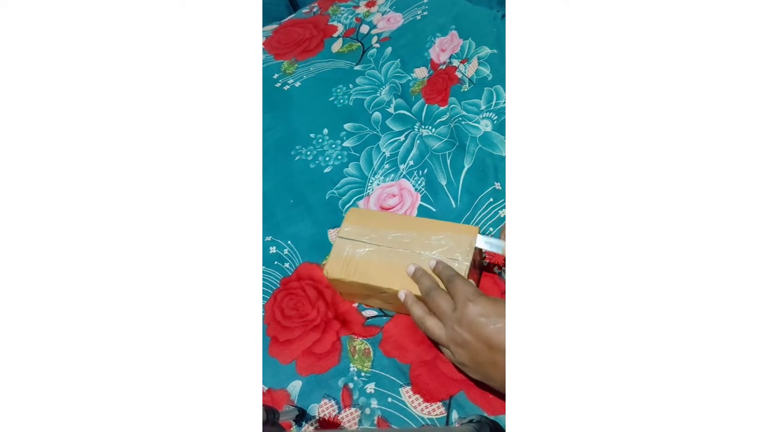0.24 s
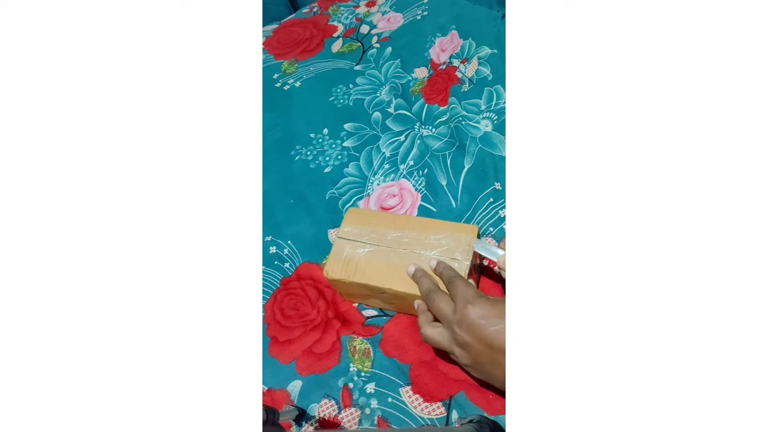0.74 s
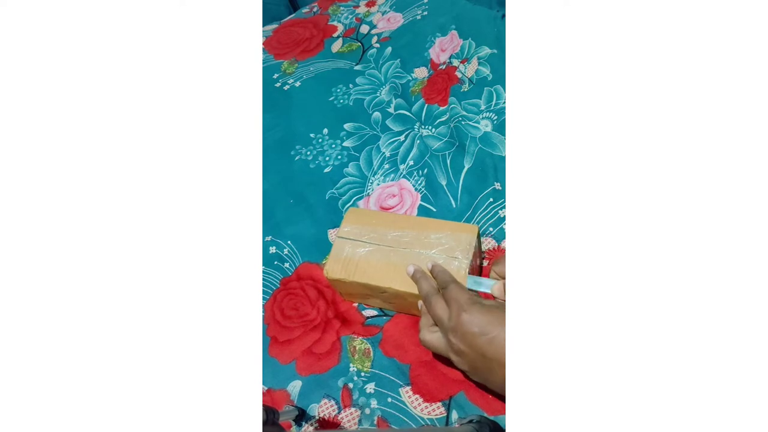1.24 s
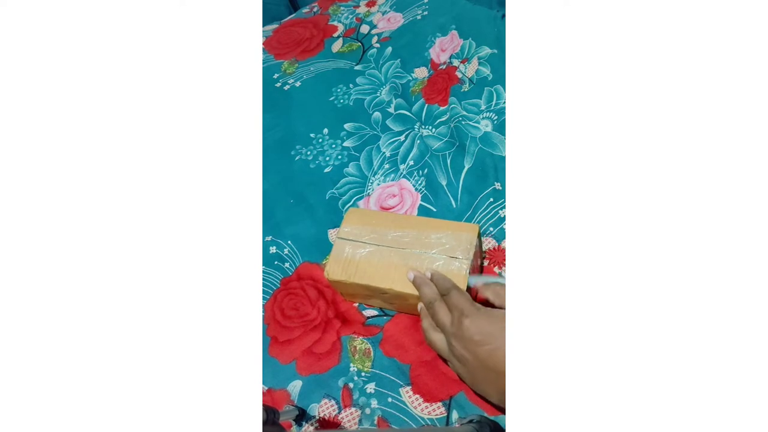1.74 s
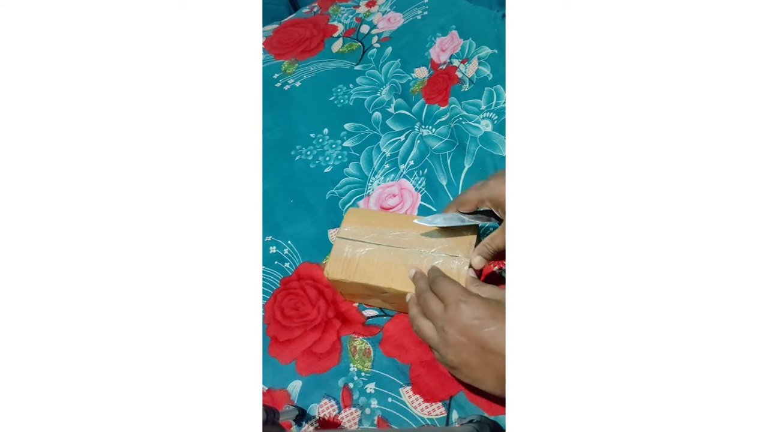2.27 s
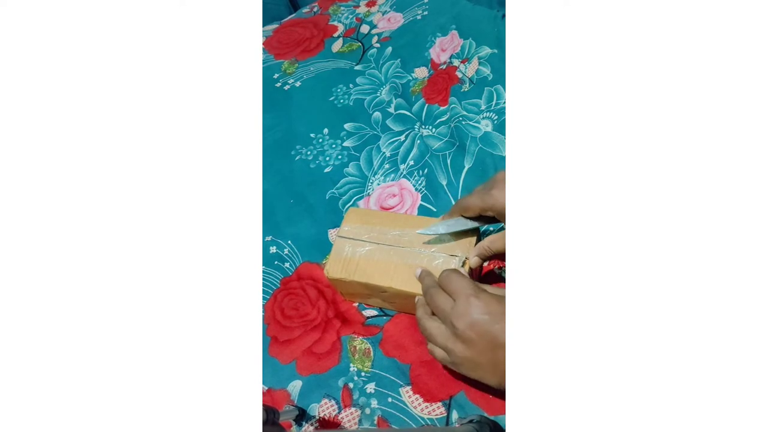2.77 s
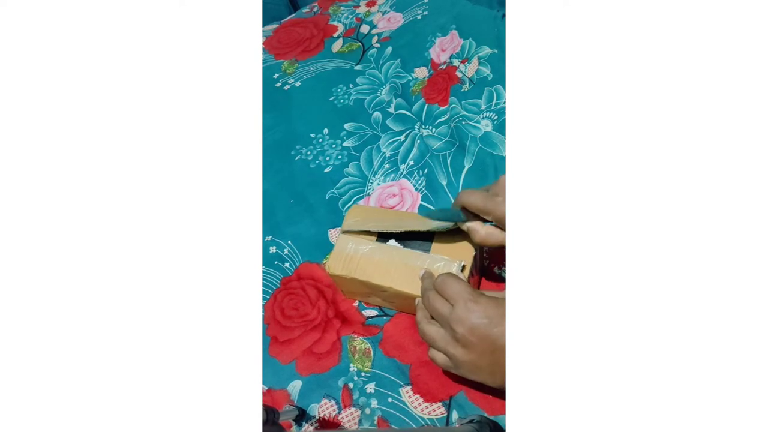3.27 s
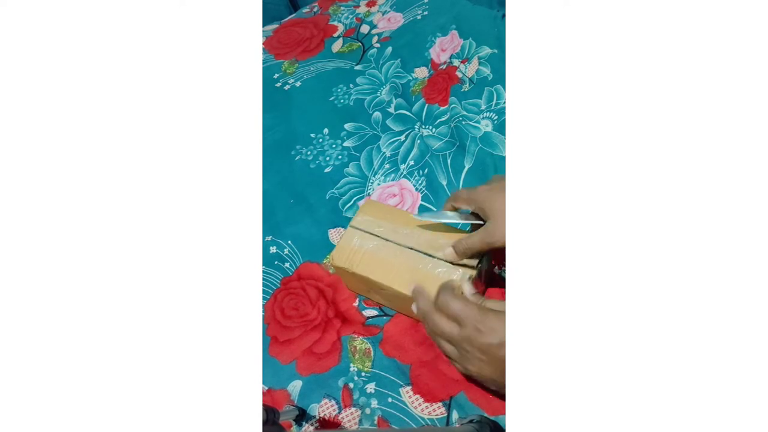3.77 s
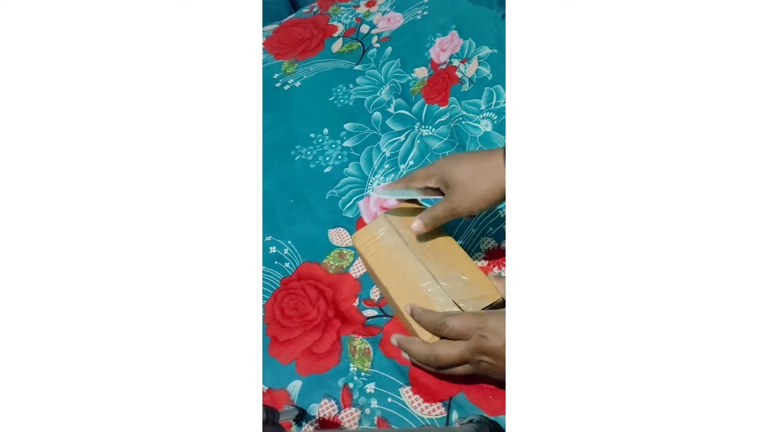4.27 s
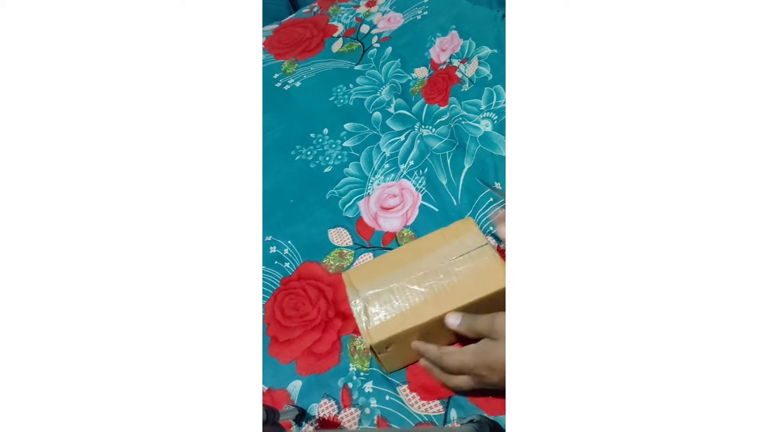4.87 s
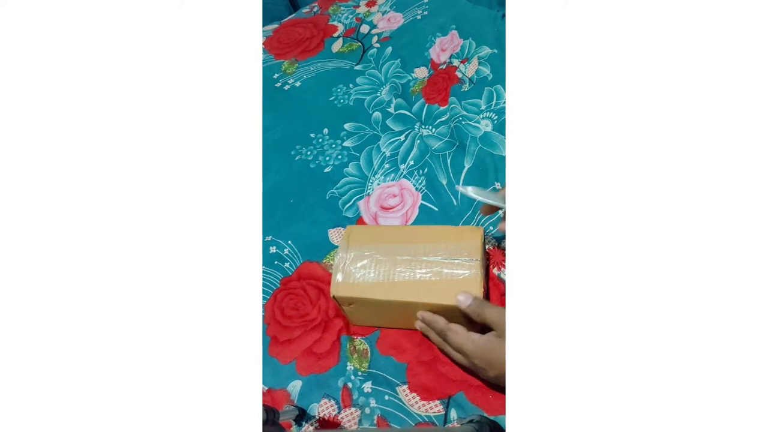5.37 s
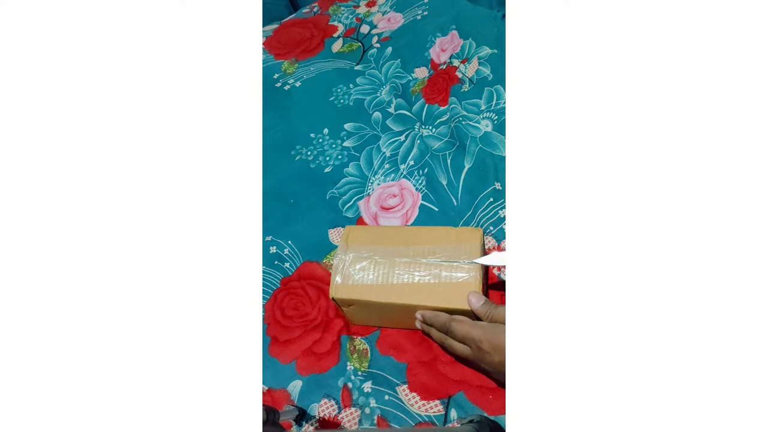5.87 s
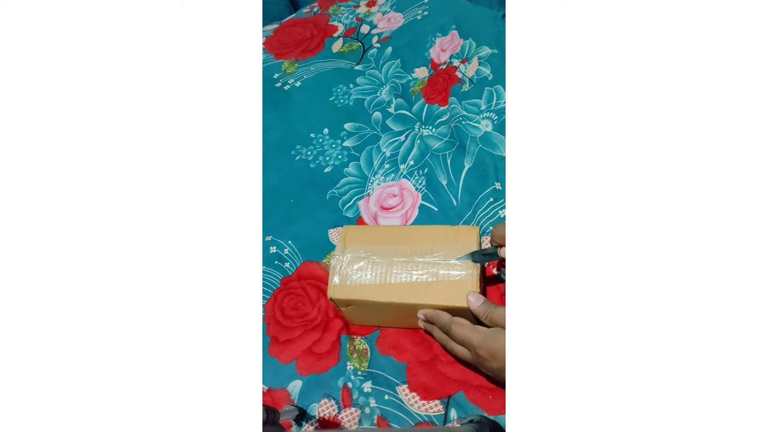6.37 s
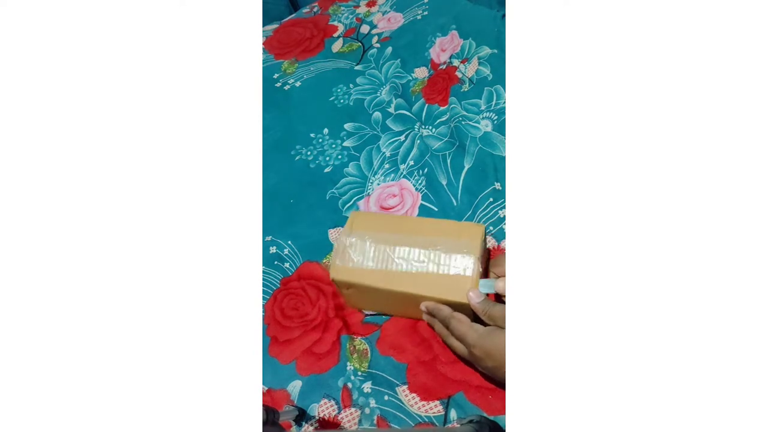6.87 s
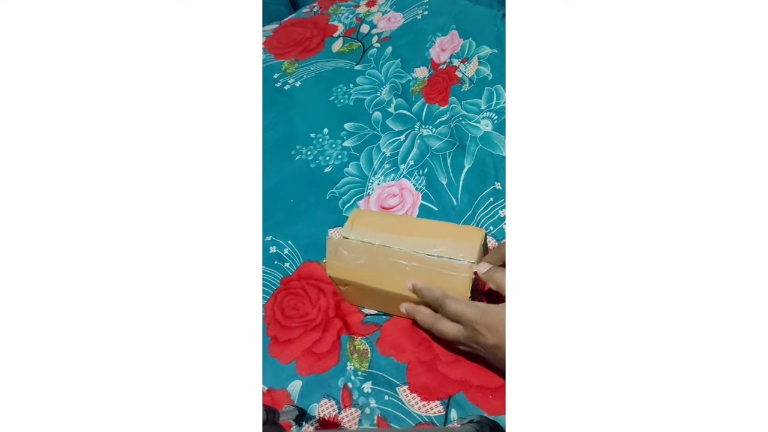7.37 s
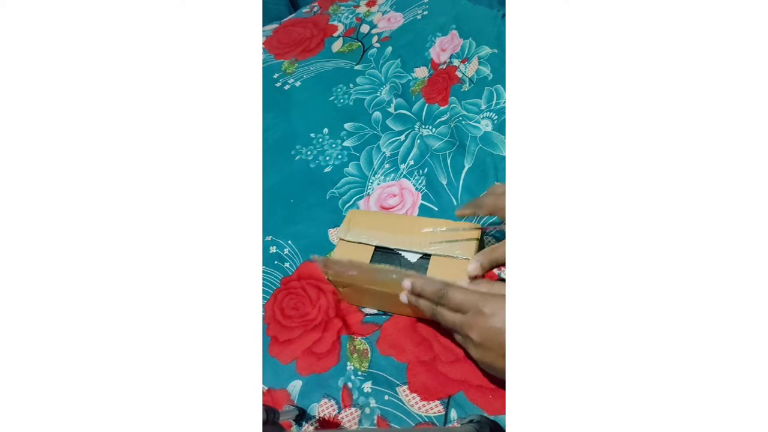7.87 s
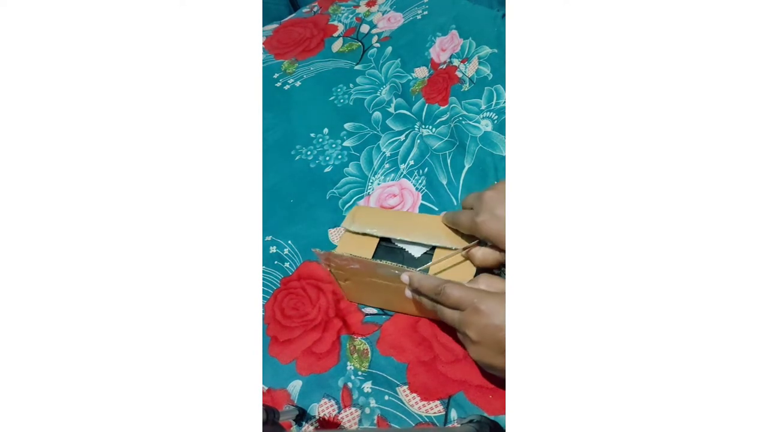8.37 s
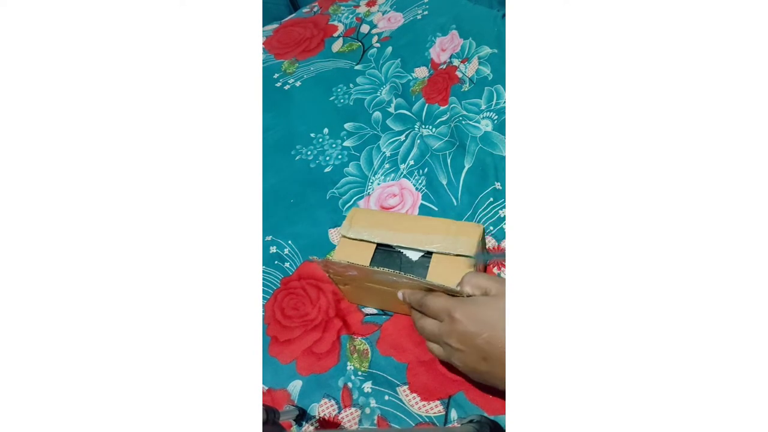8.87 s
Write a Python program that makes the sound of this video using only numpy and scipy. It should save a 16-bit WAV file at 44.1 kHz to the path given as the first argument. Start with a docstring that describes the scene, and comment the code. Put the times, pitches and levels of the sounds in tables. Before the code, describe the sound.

Small cardboard box being cut open, heard close indoors. Faint finger rubs and taps lead to brief gritty strokes and small rips of plastic tape. Quiet handling, crisp snaps and a swishing turn on cloth follow. Light scratching with crackles builds to one sharp, much louder tear with a boxy knock, then shorter rasps, a dull bump, soft rubbing and a last snap. Faint room tail and low rumble.

```python
"""Tape snaps, fizzes and rips under a sawing knife, while the small cardboard box it seals drums along.
Friction makes each cut: the blade sticks and slips, and shakes the cut edge, hollow box and tape film.
Between cuts, hands rub, turn and bump the box: softer friction, and blows that ring damped resonances.
The box lies on a cloth in a quiet room, which adds quick echoes, a faint tail and a low rumble."""
import sys
import numpy as np
from scipy import signal
from scipy.fft import rfft, irfft, next_fast_len
from scipy.io import wavfile
from scipy.ndimage import uniform_filter1d

SR = 44100
rng = np.random.default_rng(int(sys.argv[2]) if len(sys.argv) > 2 else 0)


def unload_audio(sound):
    """Save the sound as a 16-bit wav file, at the path given as the first command line argument."""
    columns = np.transpose(np.atleast_2d(sound))
    # keep every value between -1 and 1, then stretch to whole-number steps
    steps = np.round(np.clip(columns, -1, 1) * 32767)
    wavfile.write(sys.argv[1], SR, steps.astype(np.int16))


N = 402191  # length of the scene in samples
RESPONSE_N = 4096  # length of an impulse response in samples
BINS = np.fft.rfftfreq(RESPONSE_N, 1 / SR)  # its frequencies in Hz

# Source levels in dB hold before the ports and the room; colours are relative.

# Strokes of the blade sawing through tape. Each row: start in seconds, length in seconds,
# rasp level in dB, growth over the stroke in dB, drumming re rasp in dB, fizz re rasp in dB.
SAW_STROKES = [(0.677, 0.18, -61.5, 14, 4, -1.5), (0.89, 0.017, -62.5, -1, 2, 2),
               (1.051, 0.05, -56, -13, -0.5, -3.5), (1.189, 0.1, -63.5, 6, 5, -3.5),
               (1.515, 0.21, -65.5, 18.5, 4.5, 0), (6.395, 0.076, -66, -7.5, 12, 4),
               (6.483, 0.12, -59, -11, 12.5, -4), (6.627, 0.076, -51.5, 5.5, 7.5, -2),
               (6.766, 0.015, -56.5, -8, 6, -5.5), (7.073, 0.087, -49.5, 7.5, 6, -11),
               (7.257, 0.085, -52, -2, 1, -10.5), (7.401, 0.066, -63, 11, 7.5, -3.5)]
# The tape giving way all at once. Each row: time of the height in seconds, length in seconds,
# rasp level in dB, fizz re rasp in dB.
RIPS = [(0.852, 0.021, -47, 1), (1.723, 0.047, -55, 4), (2.805, 0.016, -48.5, 12.5),
        (6.603, 0.034, -41.5, -13), (6.706, 0.028, -23, -7), (7.973, 0.025, -57.5, 1)]
# Colour of the cut edge. Each row: frequency in Hz, level in dB.
EDGE_COLOUR = [(450, -12), (650, -2), (900, 1.5), (1600, 6), (2150, 3.5), (2600, -3), (3200, -7),
               (3800, -26), (6000, -60)]
# Colour of the hollow box. Each row: frequency in Hz, level in dB.
BOX_COLOUR = [(30, -36), (80, -4), (150, -5), (240, -3), (320, 0.5), (410, -2), (520, -9), (750, -11),
              (1500, -72)]
# Colour of the tape film. Each row: frequency in Hz, level in dB.
FILM_COLOUR = [(1800, -8), (3000, 10), (3900, 0.5), (4800, 9), (7500, 7), (9000, -0.5), (12500, -3.5),
               (14500, 2.5)]


def cutting():
    """Stick-slip excitation: jerks of the blade drive edge, box and film; in a rip they crowd together."""
    edge = response(read(EDGE_COLOUR, BINS) + panel_db())
    box = response(read(BOX_COLOUR, BINS) + panel_db())
    film = response(read(FILM_COLOUR, BINS))
    bodies = [edge, box, film]
    sawing = wandering(slips(per_s=550, spread_db=3, drag=0.3, ragged_db=1.8), patchy_db=3.5)
    tearing = wandering(slips(per_s=2200, spread_db=2.5, drag=0.3, ragged_db=1.5), patchy_db=3.5)
    out = np.zeros(N)
    for start, length, db, growth_db, drum_db, fizz_db in SAW_STROKES:
        levels = [db, db + drum_db, db + fizz_db]
        out += stroke(start, draw(length, growth_db), sawing, bodies, levels)
    for s, length, db, fizz_db in RIPS:
        # the more film parts, the harder the box springs back, up to 2 dB re rasp
        drum_db = 2 + min(fizz_db, 0)
        start, force = swell(s, length, rise_share=0.56, shape=1.68)
        out += stroke(start, force, tearing, bodies, [db, db + drum_db, db + fizz_db])
    return out


# The strip of tape ahead of the blade singing as its free length changes. Each row: start in seconds,
# length in seconds, level in dB, first resonance in Hz, last resonance in Hz.
ZIPS = [(1.278, 0.05, -59.5, 1540, 760), (1.677, 0.051, -49.5, 1040, 2270), (7.266, 0.029, -51, 1870, 2460)]


def zipping():
    """Gliding resonance: quick slips ring the taut tape, whose resonance moves as the blade travels."""
    friction = slips(per_s=1500, spread_db=2, drag=0.3, ragged_db=1)
    out = np.zeros(N)
    for start, length, db, first_hz, last_hz in ZIPS:
        hz = np.geomspace(first_hz, last_hz, round(length * SR))
        ring = friction[round(start * SR):][:len(hz)]
        for _ in range(2):
            ring = resonate(ring, hz, width_hz=1020)
        add(out, start, amp(db) * evened(ring * signal.windows.tukey(len(hz))))
    return out


# Levels of the point feeling its way along the seam, in one row: blade ring in dB,
# drumming in dB, fizz in dB.
SCRAPE_LEVELS = (-73, -66.5, -76)
# Modes of the blade. Each row: frequency in Hz, width in Hz, level in dB.
BLADE_MODES = [(1690, 530, 4.5), (4800, 560, -7.5), (5640, 400, -12)]


def scraping():
    """Modal resonance under light friction: the point drags over the tape and the blade rings faintly."""
    power = 0
    for hz, width, db in BLADE_MODES:
        power = power + amp(2 * db) / (1 + (2 * (BINS - hz) / width) ** 2)
    blade = response(10 * np.log10(power))
    box = response(read(BOX_COLOUR, BINS) + panel_db())
    film = response(read(FILM_COLOUR, BINS))
    friction = wandering(slips(per_s=5800, spread_db=0.5, drag=0.43, ragged_db=3.1), patchy_db=2.5)
    start_s, length_s = 5.70, 0.68
    return stroke(start_s, draw(length_s, growth_db=1.0), friction, [blade, box, film], SCRAPE_LEVELS)


# Tape film snapping under the point. Each row: time in seconds, peak in dB before gain_db.
SNAPS = [(0.3975, -37), (0.4263, -43), (0.4962, -32.5), (2.9203, -38.5), (3.0904, -40), (3.149, -58),
         (3.815, -34), (3.8247, -26.5), (5.5739, -36), (5.662, -43), (5.8287, -44), (5.9347, -35),
         (6.0161, -30), (6.0486, -28), (6.1788, -37.5), (6.268, -39.5), (6.4596, -26.5), (6.6617, -21.5),
         (8.3655, -33.5), (9.0037, -29), (9.0087, -31)]
# The point breaking through tape and the fibres under it. Each row: time in seconds,
# peak in dB before gain_db.
CRACKS = [(0.7998, -47), (0.824, -40), (0.851, -37), (0.8564, -37), (1.0586, -47), (1.7435, -43),
          (2.139, -53), (2.233, -46), (2.2414, -49), (2.2474, -46.5), (2.321, -40.5), (2.4158, -43.5),
          (3.825, -39), (4.913, -41.5), (6.68, -23), (6.6949, -23.5), (6.714, -21.5), (9.0045, -33.5)]
# Blade and fingernails tapping the cardboard. Each row: time in seconds,
# peak in dB before gain_db, ring in Hz.
TAPS = [(0.259, -49, 725), (2.787, -34.5, 2190), (2.92, -47, 2350), (3.409, -53, 1880), (3.694, -49, 744),
        (3.908, -36.5, 2040), (3.911, -42, 774), (4.157, -48, 1160), (4.212, -48, 1780), (4.678, -43, 656),
        (5.689, -49, 2240), (6.404, -34, 1570), (6.49, -32.5, 1260), (6.684, -20.5, 1600),
        (7.121, -38, 1210), (7.204, -45, 1560), (7.328, -38, 920), (7.462, -38, 1030), (8.116, -48.5, 825)]
# The box bumped or flexing. Each row: time in seconds, peak in dB before gain_db, ring in Hz.
KNOCKS = [(0.868, -45, 167), (1.722, -38, 326), (1.743, -40.5, 324), (2.81, -46, 257), (3.412, -52, 312),
          (3.699, -45.5, 340), (4.522, -40.5, 252), (4.537, -38.5, 307), (4.627, -42, 226),
          (4.914, -38.5, 205), (6.206, -40, 325), (6.489, -29.5, 189), (6.688, -19, 228.6),
          (6.708, -14.5, 410), (7.328, -36, 280), (7.96, -37, 363), (8.32, -43, 308), (8.974, -47, 256)]


def handling():
    """Impact excitation: snaps of film, cracks of fibre, dry taps on the wall, hollow knocks of the box."""
    skin = read(SKIN_COLOUR, BINS)
    wall = panel_db() + read([(2800, 20.0), (6000, -4.0)], BINS)
    box = panel_db() + read(BOX_COLOUR, BINS)
    snap_rows = [(s, db, 6430) for s, db in SNAPS]  # ring in Hz
    crack_rows = [(s, db, 1990) for s, db in CRACKS]
    snaps = hits(snap_rows, skin, q=1.26, crumble=0.95, crumble_s=0.00095, gain_db=-0.5)
    cracks = hits(crack_rows, skin, q=0.5, crumble=1.77, crumble_s=0.0027, gain_db=0.0)
    taps = hits(TAPS, wall, q=2.6, crumble=0.76, crumble_s=0.0032, gain_db=1.5)
    knocks = hits(KNOCKS, box, q=3.66, crumble=0.34, crumble_s=0.0014, gain_db=-1.5)
    return snaps + cracks + taps + knocks


# Fingers rubbing over the box and its flaps. Each row: time of the height in seconds,
# length in seconds, hiss level in dB, drumming re hiss in dB.
RUBS = [(0.015, 0.087, -68.5, 3), (0.175, 0.074, -60, -16), (0.368, 0.094, -65.5, -17),
        (0.514, 0.073, -63.5, -4), (1.866, 0.066, -68.5, -14), (2.233, 0.058, -66.5, -1),
        (2.407, 0.038, -61, -1.5), (2.608, 0.085, -64, -3), (2.785, 0.12, -74, 12),
        (3.547, 0.043, -62, -0.5), (3.669, 0.17, -64.5, 2.5), (3.845, 0.17, -59, -1),
        (7.551, 0.055, -64.5, -12), (7.93, 1, -72.5, 4.5), (8.213, 0.036, -63.5, 0),
        (8.511, 0.15, -65.5, -5), (8.806, 0.18, -62, -4)]
# Colour of sliding, also used for snaps and cracks. Each row: frequency in Hz, level in dB.
SKIN_COLOUR = [(200, -6), (550, 2), (1900, 5.5), (3000, 3.5), (3900, -4), (5000, 0.5), (7300, 1.5),
               (10000, -5), (12500, -6.5), (15000, 0.5)]


def sliding():
    """Fine-grained friction: skin on cardboard slips far more often and more softly than the blade saws."""
    bodies = [response(read(SKIN_COLOUR, BINS)), response(read(BOX_COLOUR, BINS))]
    friction = wandering(slips(per_s=4000, spread_db=4.0, drag=0.7, ragged_db=1.3), patchy_db=4.0)
    out = np.zeros(N)
    for s, length, db, drum_db in RUBS:
        start, force = swell(s, length, rise_share=0.38, shape=4.1)
        out += stroke(start, force, friction, bodies, [db, db + drum_db])
    return out


# The box turned round on the cloth. Each row: time in seconds,
# level in dB before the offsets of hiss and drumming.
TURN = [(4.14, -73.5), (4.292, -63), (4.592, -60), (4.694, -74), (4.822, -69), (4.866, -82), (4.92, -64.5),
        (4.968, -71), (5.074, -65.5), (5.142, -75), (5.284, -67), (5.45, -91)]


def turning():
    """Speed-dependent friction: the hiss of cardboard on cloth follows the speed; the box drums along."""
    hiss_db, drum_db = 4, 1.5
    drum_power = 1.73  # the drumming grows faster with speed than the hiss
    friction = wandering(slips(per_s=5300, spread_db=4, drag=0.91, ragged_db=0.3), patchy_db=3.0)
    times, level = np.transpose(TURN)
    start, top_db = times[0], level.max()
    t = np.arange(start, times[-1], 1 / SR)
    speed = amp(np.interp(t, times, level) - top_db)
    surface, box = response(read(SKIN_COLOUR, BINS)), response(read(BOX_COLOUR, BINS))
    hiss = stroke(start, speed, friction, [surface], [top_db + hiss_db])
    drumming = stroke(start, speed ** drum_power, friction, [box], [top_db + drum_db])
    return hiss + drumming


# The cloth-covered surface heaving under the box. Each row: time of the height in seconds,
# length in seconds, level in dB.
THUDS = [(6.498, 0.31, -50), (6.68, 0.028, -32.5), (6.735, 0.15, -60.5)]
# Colour of that surface. Each row: frequency in Hz, level in dB.
SURFACE_COLOUR = [(30, 11.5), (55, 4), (150, 14), (300, -24.5)]


def thudding():
    """Transmission into the support: the hardest pushes reach the soft surface under the box."""
    heave = rng.standard_normal(N)
    surface = response(read(SURFACE_COLOUR, BINS))
    out = np.zeros(N)
    for s, length, db in THUDS:
        start, force = swell(s, length, rise_share=0.091, shape=0.41)
        out += stroke(start, force, heave, [surface], [db])
    return out


# Modes of the cardboard panels. Each row: frequency in Hz, width in Hz, lift in dB.
PANEL_MODES = [(238, 22, 7), (400, 35, 9), (908, 50, 5), (1745, 45, 4), (2140, 40, 3), (3180, 50, 7)]


def panel_db():
    """Modal response: the lift in dB that the panel modes give to whatever shakes the box."""
    return sum(db / (1 + (2 * (BINS - hz) / width) ** 2) for hz, width, db in PANEL_MODES)


def slips(per_s, spread_db, drag, ragged_db):
    """Stick and slip: clicks of uneven size over a smooth drag, clumped as fibres catch and let go."""
    size = amp(spread_db * np.minimum(rng.exponential(1, N), 4))
    happens = rng.random(N) < per_s / SR
    clicks = size * rng.choice([-1, 1], N) * happens
    grip = amp(ragged_db * evened(uniform_filter1d(rng.standard_normal(N), size=300)))
    return evened(grip * (evened(clicks) + drag * rng.standard_normal(N)))


def wandering(x, patchy_db):
    """Moving contact: patches of the spectrum come and go, as resonances do when the point travels."""
    z = signal.stft(x, nperseg=512)[2]
    blur = np.outer(np.hanning(9), np.hanning(7))
    patches = evened(signal.fftconvolve(rng.standard_normal(z.shape), blur, "same"))
    return signal.istft(z * evened(amp(patchy_db * patches)))[1][:N]


def draw(length, growth_db):
    """Force of a drawn blade: it bites, bears down or eases steadily, and lets go."""
    attack_s, release_s = 0.0019, 0.026
    t = np.arange(0, length + 5 * release_s, 1 / SR)
    bite = np.minimum(t / attack_s, 1)
    hold = amp(growth_db * (np.minimum(t / length, 1) - 0.5))
    return bite * hold * np.exp(-np.maximum(t - length, 0) / release_s)


def swell(s, length, rise_share, shape):
    """Transient force: start and course of a push that builds to its height at time s and dies away."""
    rise = length * rise_share
    fall = length - rise
    t = np.arange(-3 * rise, 3 * fall, 1 / SR)
    return s + t[0], np.exp(-abs(t / np.where(t < 0, rise, fall)) ** shape)


def balanced(x, smooth_hz, evenness):
    """Broadband drive: many slips push about equally in every band, so the body sets most of the colour."""
    z = rfft(x, 2 * len(x))
    power = uniform_filter1d(abs(z) ** 2, int(smooth_hz * 2 * len(x) / SR) + 1)
    return irfft(z / (abs(power) + 1e-12) ** (evenness / 2))[:len(x)]


def stroke(start, force, friction, bodies, levels):
    """Source and filter: force swells the friction, which drives every body at that body's level."""
    stretch = friction.take(round(start * SR) + np.arange(len(force)), mode="wrap")
    # half of the force before the balancing and half after it
    drive = np.sqrt(force) * balanced(np.sqrt(force) * stretch, smooth_hz=260, evenness=0.8)
    out = np.zeros(N)
    for body, db in zip(bodies, levels):
        sound = signal.fftconvolve(drive, body)
        add(out, start, amp(db) * sound * np.linalg.norm(force) / np.linalg.norm(sound))
    return out


def hits(rows, colour, q, crumble, crumble_s, gain_db):
    """Damped resonance: a push and a brief crumble of fibres ring one mode of the thing struck."""
    out, t = np.zeros(N), np.arange(RESPONSE_N) / SR
    noise = rng.standard_normal((len(rows), RESPONSE_N))
    for (s, db, hz), grit in zip(rows, noise):
        grit = grit * np.exp(-t / crumble_s)
        push = (t == 0) + crumble * grit / np.linalg.norm(grit)
        ring_db = -10 * np.log10(1 + (q * (BINS / hz - hz / (BINS + 1))) ** 2)
        sound = signal.fftconvolve(push, response(ring_db + colour))
        add(out, s + 0.0007, amp(db + gain_db) * sound / abs(sound).max())
    return out


def resonate(x, hz, width_hz):
    """Heterodyne resonator: shifts the curve hz down to zero, smooths there and shifts back."""
    turn = np.exp(2j * np.pi * np.cumsum(hz) / SR)
    r = np.exp(-np.pi * width_hz / SR)
    return (turn * signal.lfilter([1 - r], [1, -r], x / turn)).real


# Width of the sound between left and right. Each row: frequency in Hz, # side re mid in dB (before side_db in
# the background).
SIDE_WIDTH = [(200, -14), (1300, -4), (2500, -6), (4500, -1.5), (8000, -10.5)]


def ports(x, spread_s):
    """Multipath phase: many short paths set the two microphone ports out of phase, by frequency."""
    t = np.arange(RESPONSE_N) / SR
    paths = rfft(rng.standard_normal(RESPONSE_N) * np.exp(-t / spread_s))
    weight = evened(np.cos(np.angle(paths))) * amp(read(SIDE_WIDTH, BINS))
    quarter_turn = np.fft.fftshift(irfft(1j * weight))
    side = signal.oaconvolve(x, quarter_turn, "same")
    return np.array([x + side, x - side])


def scatter(t60, delay_s):
    """Diffuse decay: two unrelated trains of reflections of energy 1, each band dying at its own speed."""
    hz, t, z = signal.stft(rng.standard_normal((2, SR)), SR, nperseg=256)
    tail = signal.istft(z * amp(-60 * t / read(t60, hz)[:, None]), SR)[1]
    tail = np.pad(tail, ((0, 0), (round(delay_s * SR), 0)))[:, :SR]
    return tail / np.linalg.norm(tail, axis=1, keepdims=True)


# Reverberation of the bare room. Each row: frequency in Hz, time to fall by 60 dB in seconds.
ROOM_DECAY = [(150, 1), (1500, 0.73), (6000, 0.66), (15000, 0.58)]


def room(x, near_db, far_db):
    """Reverberation: quick echoes off the box and nearest walls, then the faint ring of the bare room."""
    near = amp(near_db) * scatter([(1000, 0.1)], delay_s=0.002)
    far = amp(far_db) * scatter(ROOM_DECAY, delay_s=0.015)
    mid, side = signal.fftconvolve(x[None], near + far, axes=1)[:, :N]
    side = coloured(side, [(200, -15.5), (2500, -0.5)])  # long waves reach both ports alike
    return np.array([mid + side, mid - side])


# Colour of the room rumble. Each row: frequency in Hz, level in dB.
RUMBLE_COLOUR = [(20, 0.5), (45, -5), (120, -6.5), (200, -16), (330, -13), (600, -23), (2000, -27.5),
                 (4000, -36), (15000, -39)]


def background(side_db):
    """Ambient noise: low room rumble shared by both ports, under a faint hiss that is not."""
    level_db = -62.5
    mid, side = evened(coloured(rng.standard_normal((2, N)), RUMBLE_COLOUR))
    mid = wandering(mid, patchy_db=1.5)
    side = amp(side_db) * coloured(side, SIDE_WIDTH)
    return amp(level_db) * np.array([mid + side, mid - side])


def amp(db):
    """Level law: decibels to gain."""
    return 10 ** (np.asarray(db) / 20)


def evened(x):
    """Equal power: scales to rms 1."""
    return x / np.sqrt(np.mean(x ** 2) + 1e-20)


def read(points, hz):
    """Logarithmic pitch: joins (Hz, value) points on a log-frequency axis."""
    f, value = np.transpose(points)
    return np.interp(np.log(hz + 1), np.log(f + 1), value)


def add(mix, s, sound):
    """Superposition: lays a sound into the mix from time s."""
    at = round(s * SR)
    sound = sound[max(-at, 0):]
    part = mix[max(at, 0):][:len(sound)]
    part += sound[:len(part)]


def response(db):
    """Minimum phase: the causal impulse response of a dB curve over BINS."""
    log_gain = np.log(amp(np.maximum(db, -100)))
    circle = np.concatenate([log_gain, log_gain[-2:0:-1]])
    return irfft(np.exp(np.conj(signal.hilbert(circle)))[:len(BINS)])


def coloured(x, points):
    """Linear filtering: gives a long sound the spectrum of (Hz, dB) points."""
    size = next_fast_len(N + RESPONSE_N)
    gain = amp(read(points, np.fft.rfftfreq(size, 1 / SR)))
    return irfft(rfft(x, size) * gain, size)[..., :N]


def scene():
    """Superposition of all the work on the box, heard from close by in the room."""
    box = cutting() + zipping() + scraping() + handling() + sliding() + turning() + thudding()
    direct = ports(box, spread_s=0.0015)
    return direct + room(box, near_db=-10.0, far_db=-17.5) + background(side_db=3.5)


# Colour of the left port over the right. Each row: frequency in Hz, difference in dB.
PORT_LEAN = [(200, 0), (2800, 1), (4500, 3), (8000, -3), (10500, -2.5), (14000, 4)]


def record(dry):
    """Linear filtering: the two ports differ in colour, half each way; then a low-pass limits the band."""
    left = coloured(dry[0], [(hz, db / 2) for hz, db in PORT_LEAN])
    right = coloured(dry[1], [(hz, -db / 2) for hz, db in PORT_LEAN])
    edge = signal.firwin(511, 16100, window=("kaiser", 9), fs=SR)  # cutoff in Hz
    return signal.oaconvolve(np.array([left, right]), edge[None], "same", axes=1)


dry = scene()
out = record(dry)
unload_audio(out)
```